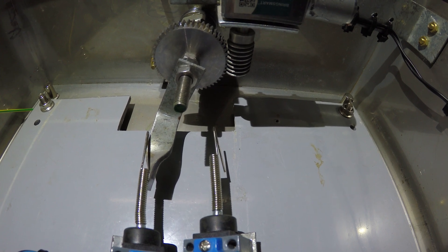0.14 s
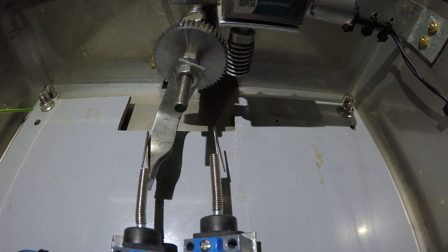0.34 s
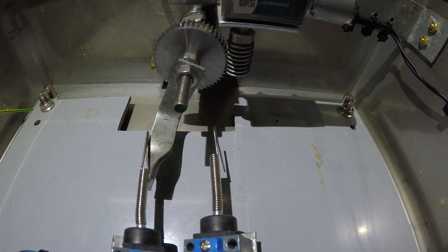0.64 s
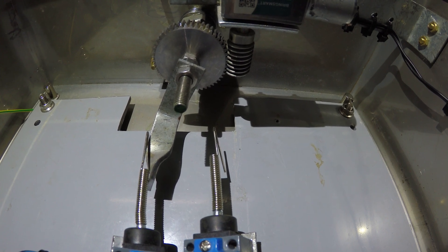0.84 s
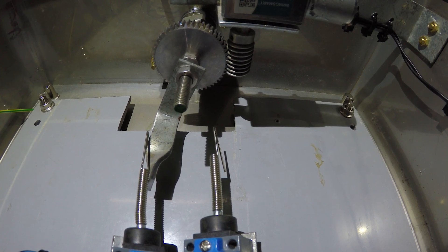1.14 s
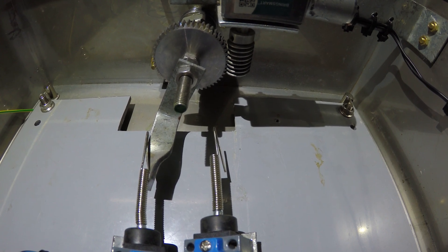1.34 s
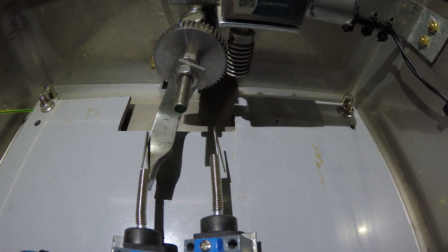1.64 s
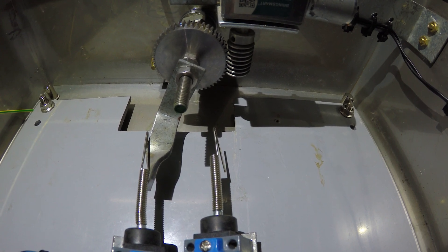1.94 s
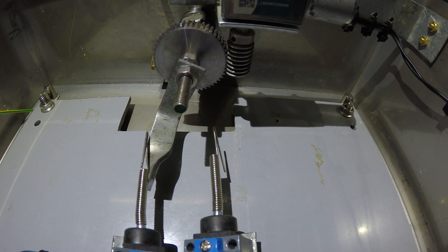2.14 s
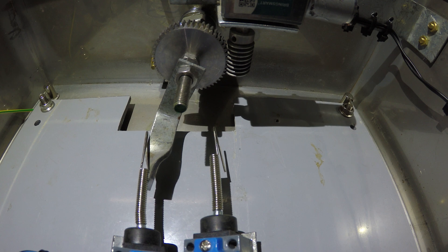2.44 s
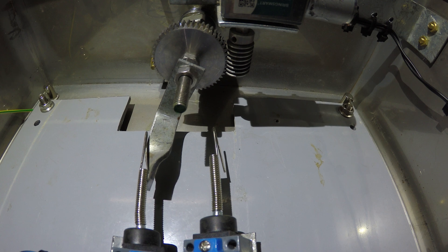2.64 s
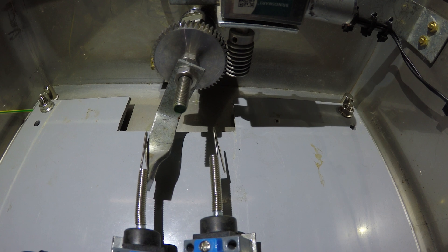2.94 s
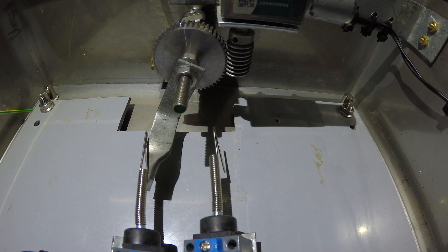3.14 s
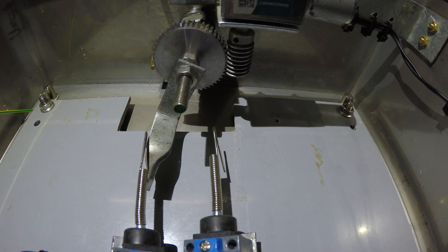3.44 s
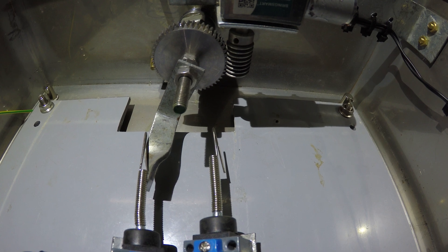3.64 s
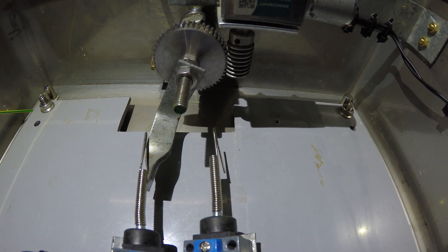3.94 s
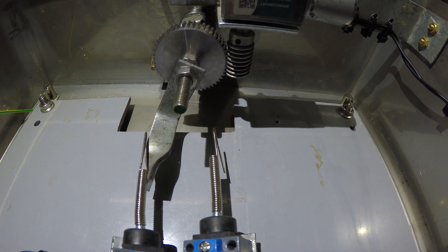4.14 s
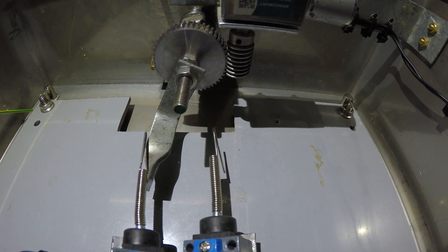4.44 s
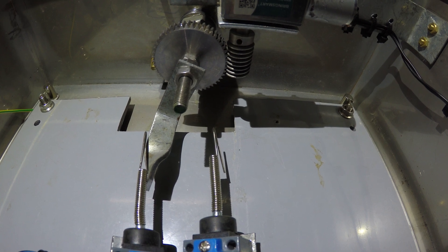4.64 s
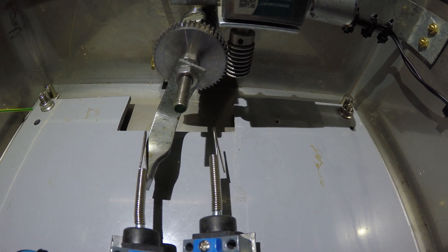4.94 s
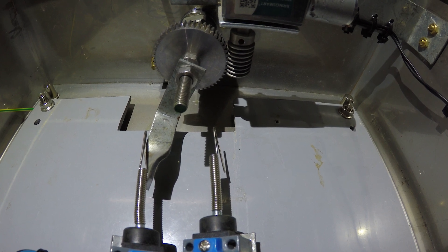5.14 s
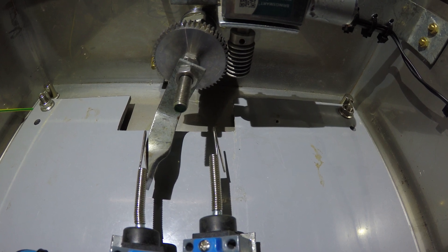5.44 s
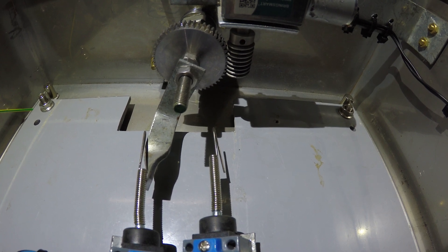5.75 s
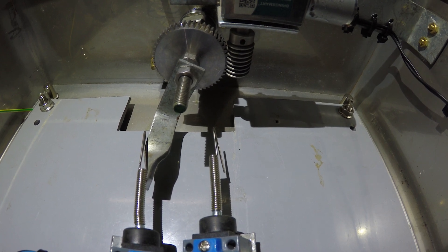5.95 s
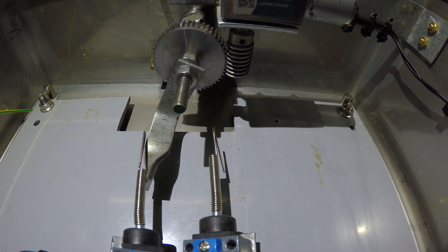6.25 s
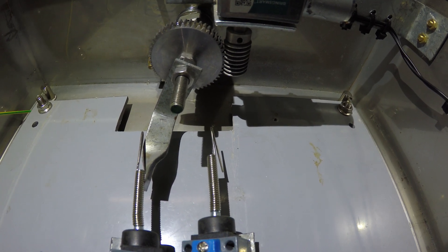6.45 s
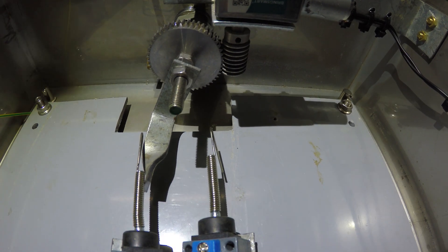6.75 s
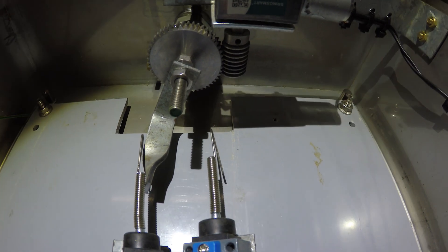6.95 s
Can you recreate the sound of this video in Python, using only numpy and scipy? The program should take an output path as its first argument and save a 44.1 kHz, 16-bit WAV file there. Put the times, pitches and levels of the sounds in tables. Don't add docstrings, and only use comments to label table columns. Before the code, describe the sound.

A small geared motor whirrs and grinds steadily in a metal box, a switch snaps loudly, gears coast ticking to rest, then a lid scrapes.

```python
import sys
import numpy as np
from scipy import signal
from scipy.fft import rfft, irfft, next_fast_len
from scipy.io import wavfile
from scipy.ndimage import uniform_filter1d, map_coordinates

SR = 44100
rng = np.random.default_rng(int(sys.argv[2]) if len(sys.argv) > 2 else 0)


def to_wav(s):
    ch = np.atleast_2d(s).T
    pcm = np.round(np.clip(ch, -1, 1) * 32767)
    wavfile.write(sys.argv[1], SR, pcm.astype(np.int16))


def decibels_to_gain(level_db):
    exponent = np.asarray(level_db, float) / 20
    return 10 ** exponent


N = 313551
T = np.arange(N) / SR
CUT_S = 5.633


def level(x, db):
    return x * decibels_to_gain(db) / np.sqrt(np.mean(x ** 2))


def ring(x, modes):
    size = next_fast_len(N + SR // 2)
    f = np.arange(size // 2 + 1) * SR / size + 1e-3
    body = 0
    for k, (hz, width, db) in enumerate(modes):
        body = body + (-1) ** k * decibels_to_gain(db) / (1 + 1j * (f / hz - hz / f) * hz / width)
    return irfft(rfft(x, size) * body, size)[:N]


def noise():
    return rng.standard_normal(N)


def grit(rough_db, size):
    return level(rng.standard_normal(size) * decibels_to_gain(rough_db * rng.exponential(size=size)), 0)


def colour(points, x):
    hz, db = np.transpose(points)
    f = np.arange(N // 2 + 1) * SR / N + 1
    return irfft(rfft(x) * decibels_to_gain(np.interp(np.log(f), np.log(hz), db)), N)


def blows(table, modes):
    push = 0
    for start, db, length in table:
        push = push + decibels_to_gain(db) * (T >= start) * np.exp(-np.maximum(T - start, 0) / max(length, 1e-4))
    return 10 * ring(push * noise(), modes)


# [f/Hz, level/dB per Hz]
ROOM_COLOUR = [(12, -0.5), (25, 3.5), (45, -0.5), (82, -8), (180, -11.5), (280, -20.5), (720, -31.5),
               (1030, -25), (1190, -32.5), (2400, -32.5), (2730, -33), (13000, -44), (15300, -45)]
# [f/Hz, level/dB]
CIRCUIT_TONES = [(2498, -70), (12484, -81), (899, -78)]


def room():
    tones = sum(np.sqrt(2) * decibels_to_gain(db) * np.sin(2 * np.pi * hz * T) for hz, db in CIRCUIT_TONES)
    return level(colour(ROOM_COLOUR, noise()), -51.5) + tones


# [f/Hz, level/dB per Hz]
WALL_COLOUR = [(300, -23.5), (1500, -10), (2500, -18.5), (3500, 1), (4100, -1.5), (4800, 4.5), (5300, -6.5),
               (6000, -16), (7250, -19), (9000, -12), (11500, -42.5), (15000, -34)]


def walls(x):
    return colour(WALL_COLOUR, x)


# [f/Hz, width/Hz, level/dB]
FRAME_MODES = [(390.4, 27, -3.5), (502, 29, 3), (690, 28, -1)]


def frame(x):
    return ring(x, FRAME_MODES)


def stroke(start, attack, hold, release, db):
    up = np.minimum((T - start) / attack, 1 - (T - start - attack - hold) / release)
    fade_db = 30
    return decibels_to_gain(db - fade_db * (1 - np.minimum(up, 1))) * (T > start)


def sag(x):
    sag_per_s, middle_s = .14, 6.66
    delay = sag_per_s / 2 * np.maximum(T - CUT_S, 0) * (T + CUT_S - 2 * middle_s)
    return map_coordinates(x, [(T - delay) * SR], mode="mirror")


# [f/Hz, width/Hz, level/dB]
LATCH_MODES = [(3140, 120, -6), (4470, 200, -5), (5500, 200, -5), (6400, 160, -8), (7860, 640, -8),
               (8700, 660, -6.5), (11370, 900, -8.5), (14000, 2000, -18.5), (350, 51, -6), (180, 50, -20)]
# [t/s, level/dB, length/s]
LATCH_BLOWS = [
    (6.5735, -32.5, 0.0017),
    (6.595, -52, 0.0028),
    (6.612, -54, .004),
    (6.623, -56, 0.0078),
]
# [f/Hz, width/Hz, level/dB]
FIRST_EDGE_MODES = [(880, 30, -6), (1310, 170, -13), (2100, 350, -12), (2560, 80, -10), (3530, 160, -3.5),
                    (3900, 80, -13), (4330, 90, 2), (6000, 170, -5.5), (7100, 240, -13), (9000, 360, -14),
                    (10500, 450, -17)]
SECOND_EDGE_MODES = [(870, 31, -4), (1357, 40, 4), (1600, 59, -2.5), (2420, 94, -6.5), (3140, 35, -1),
                     (3400, 65, -6), (3760, 42, -13), (5100, 97, -25), (5600, 210, -14.5), (6540, 45, -14),
                     (7250, 100, -18), (8200, 49, -21), (8950, 270, -27), (10040, 110, -23)]
CREEP_STROKE = (6.22, .33, .03, .05, -65)
JOLT_STROKE = (6.595, .027, .003, .06, -52)
FIRST_EDGE_STROKE = (6.56, .045, .17, .25, -54)
SECOND_EDGE_STROKE = (6.5, .3, .6, .1, -54.5)
SHAKE_STROKE = (6.55, .11, .6, .1, -54)
GRIP_STROKE = (6.28, .16, .9, .1, -55)
BUMP_STROKES = [
    (6.76, .09, .01, .1, -51),
    (6.98, .085, .01, .1, -47),
]


def lid():
    jolt = stroke(*JOLT_STROKE)
    first = stroke(*CREEP_STROKE) + stroke(*FIRST_EDGE_STROKE) + jolt
    second = stroke(*SECOND_EDGE_STROKE)
    shake = stroke(*SHAKE_STROKE) + decibels_to_gain(1.5) * jolt
    press = stroke(*GRIP_STROKE) + sum(stroke(*bump) for bump in BUMP_STROKES)
    scrape = first * sag(level(ring(grit(1.8, size=N), FIRST_EDGE_MODES), 5.8))
    scrape = scrape + second * level(ring(grit(3.5, size=N), SECOND_EDGE_MODES), 8.3)
    rub = (first + second) * level(walls(grit(1., size=N)), -3.1)
    sheet_modes = [(107, 43, -6.5), (190, 58, -2.5), (363, 38, -3), (692, 30, -11.0)]
    rumble = shake * level(ring(grit(3.2, size=N), sheet_modes), 2.9)
    grip = press * level(ring(noise(), [(35, 35, 0)]), 1.5)
    return scrape + rub + rumble + grip + blows(LATCH_BLOWS, LATCH_MODES)


# [f/Hz, width/Hz, level/dB]
SWITCH_MODES = [(2270, 130, -2), (2790, 120, 1), (3660, 1100, -12.5), (5230, 200, -0.5), (5600, 190, -2),
                (6750, 200, -0.5), (9600, 3300, -19), (13000, 4900, -20.5)]
# [t/s, level/dB, length/s]
SWITCH_BLOWS = [
    (5.6328, -12, 0.0025),
    (5.6350, -25, 0.0016),
    (5.6385, -23, .002),
    (5.644, -31.5, 0.0071),
]
# [t/s, f/Hz, peak level/dB, t60/s]
SHEET_TONES = [(5.640, 157, -25.5, 0.22), (5.640, 205, -28, 0.25), (5.640, 320, -40, 0.19),
               (5.634, 671, -17.5, 0.087), (5.636, 920, -30.5, .07), (5.637, 1600, -15, 0.12),
               (5.64, 410, -45.5, 0.32), (5.637, 1590, -24.5, 0.3), (5.701, 140, -37, 0.64),
               (6.205, 1040, -54, 0.39)]


def switch():
    rings = 0
    for start, hz, db, t60 in SHEET_TONES:
        decay = decibels_to_gain(db - 60 * np.maximum(T - start, 0) / t60)
        onset = np.clip((T - start) * hz / 2, 0, 1)
        rings = rings + decay * np.sin(2 * np.pi * hz * (T - start)) * onset
    return blows(SWITCH_BLOWS, SWITCH_MODES) + rings


# [t/s, turns per s]
SHAFT_SPEED = [(0.39, 101.833), (1.07, 101.86), (1.75, 101.888), (2.43, 101.891), (3.11, 101.874),
               (3.79, 101.827), (4.47, 101.848), (5.15, 101.809)]
FULL_SPEED = SHAFT_SPEED[-1][1]


def shaft_speed():
    friction, drag = 102.27, 1.0388
    off = np.maximum(T - CUT_S, 0)
    free = (FULL_SPEED + friction / drag) * np.exp(-drag * off) - friction / drag
    return np.where(T < CUT_S, np.interp(T, *np.transpose(SHAFT_SPEED)), np.maximum(free, 1e-3))


def passes(angle, count, phase):
    turns = angle - angle[int(CUT_S * SR)]
    crossed = np.diff(np.floor(count * (turns - phase)), prepend=0) > 0
    return np.flatnonzero(crossed & (turns > 0))


# [f/Hz, width/Hz, level/dB]
BRUSH_MODES = [(11300, 800, -0.5), (13200, 900, -15)]


def brushes(angle):
    clicks = np.zeros(N)
    clicks[passes(angle, count=3, phase=.069)] = 1
    tick_db = -24.5
    size = decibels_to_gain(tick_db - 2 - 7.3 * np.maximum(T - CUT_S, 0) + 1.5 * rng.standard_normal(N))
    return ring(clicks * size, BRUSH_MODES)


def cogging(angle):
    off = np.maximum(T - CUT_S, 0)
    tugs = 9
    pull = sum(np.sin(2 * np.pi * m * tugs * angle) / m for m in (1, 2, 3))
    return decibels_to_gain(-47) * frame(pull * (off > 0) * np.exp(-off / .8))


STRONG_ORDERS = [1, 3, 4, 5, 6, 7, 8, 9, 11, 12, 13, 14, 17, 30, 31, 36, 40, 54, 57, 63, 87, 95, 102, 111,
                 119, 120]
STRONG_ORDERS_DB = [-62, -59, -61, -59, -58, -61, -51, -46, -55, -49, -52, -49, -55, -56, -61, -48, -58,
                    -56, -61, -54, -66, -59, -64, -64, -64, -66]
# [f/Hz, level/dB]
LESSER_LINES = [(1500, -72), (7000, -72), (10000, -72), (10600, -65), (12300, -68), (13500, -73),
                (15200, -76)]


def whine(angle):
    order = np.arange(1, 150)
    hz, ceiling_db = np.transpose(LESSER_LINES)
    weakness, phase = rng.random((2, len(order)))
    db = np.interp(np.log(order * SHAFT_SPEED[0][1]), np.log(hz), ceiling_db) - 10. * weakness
    db[np.array(STRONG_ORDERS) - 1] = STRONG_ORDERS_DB
    turn = np.arange(8193) / 8192
    waves = np.sin(2 * np.pi * (order[:, None] * turn + phase[:, None]))
    lines = np.sqrt(2) * decibels_to_gain(db)[:, None] * waves
    shaft = np.interp(angle % 1, turn, lines[:7].sum(axis=0))
    windings = np.interp(angle % 1, turn, lines[7:].sum(axis=0))
    off = np.maximum(T - CUT_S, 0)
    return cogging(angle) + shaft * np.exp(-off / 0.24) + windings * np.exp(-off / .01)


def wear(tooth, ripples):
    return sum(depth * np.cos(2 * np.pi * times * (tooth - crest) / 24) for times, depth, crest in ripples)


def surface(angle, worn, rough_db):
    grains = 433
    step = (angle * grains).astype(int)
    long, short = grit(rough_db, size=72 * grains), grit(rough_db, size=24 * grains)
    worn = np.clip(worn, 0, 1) * (T < CUT_S)
    marks = (long[step % len(long)] + 1.26 * short[step % len(short)]) / 2.07
    return np.sqrt(worn) * marks + np.sqrt(1 - worn) * grit(rough_db, size=N)


def contact(since, rise, decay):
    since = np.maximum(since, 0)
    return (1 - np.exp(-since / rise)) * np.exp(-since / decay)


PROUD_TURNS = [2, 3, 7, 12, 14, 16, 20, 23, 25, 26, 29]
PROUD_TURNS_DB = [6.2, 5.1, 3, 3, 4, 8.6, 6.6, 4, 6.6, 5.7, 6.2]


def coasting(touch, share):
    t = T[T >= CUT_S]
    extra = dict(zip(PROUD_TURNS, PROUD_TURNS_DB))
    hits = []
    for k, i in enumerate(touch):
        size = decibels_to_gain(-24.5 + extra.get(k, 0)) * share[i] ** 1.13
        hits.append((T[i] - .002, size))
    last_s, last_size = hits[-1]
    hits.append((last_s + .019, last_size * decibels_to_gain(-5)))
    force = 0
    for start, size in hits:
        slow = 1 + 2.3 * (start - CUT_S)
        knock = contact(t - start, rise=0.0012, decay=0.0014 * slow)
        drag = 0.041 * contact(t - start, rise=0.0037, decay=0.043)
        force = force + size * decibels_to_gain(27.5) * (knock + drag)
    return np.pad(force, (N - len(t), 0))


def slackening(touch, share):
    starts = np.append(CUT_S, T[touch])
    since = T - starts[np.searchsorted(touch, np.arange(N))]
    relax_db_per_s = 260
    return uniform_filter1d(decibels_to_gain(1 - relax_db_per_s * np.maximum(since, 0)), size=300) * share ** 0.89


# [f/Hz, width/Hz, level/dB]
PANEL_MODES = [(805, 15, -12), (850, 14, -6), (875, 12, -9), (945, 40, -10), (987, 18, -4), (1030, 22, -4),
               (1065, 28, -3), (1100, 22, -6), (1175, 50, -9), (1225, 25, -4), (1283, 22, 0),
               (1327, 18, -4), (1420, 18, -4), (1440, 16, -3), (1590, 25, -9), (1650, 30, -13),
               (1740, 40, -11), (1790, 25, -11), (1900, 50, -16), (2050, 35, -12), (2140, 50, -16),
               (2230, 40, -17), (2340, 30, -12), (2440, 60, -19)]
GEARBOX_MODES = [(2560, 60, -14), (2770, 40, -8), (2890, 30, -9), (3050, 40, -12), (3300, 50, -10),
                 (3420, 45, -1), (3497, 50, -1), (3610, 40, -4), (3667, 30, -2), (3830, 50, -6),
                 (4075, 40, -7), (4140, 50, -7), (4358, 40, -3), (4410, 40, -6), (4670, 40, -5),
                 (4740, 60, 0), (4880, 70, -4), (5050, 80, -6), (5267, 60, -5), (5450, 60, -14),
                 (6420, 40, -16), (6850, 60, -18)]
BRACKET_MODES = [(6908, 100, 10.5), (7430, 28, -1), (9140, 50, -0.5), (9160, 250, -2), (9670, 110, 2),
                 (9700, 11, -6), (11080, 99, -4)]
# [f/Hz, level/dB per Hz]
HISS_COLOUR = [(60, -26), (160, 4), (260, -10), (500, -14), (2000, -11), (6300, 0), (7250, -4),
               (9000, -3.5), (11500, -8.5), (15300, -24.5)]
KNOCK_RIPPLES = [(1, 1.1, 23.8), (2, .7, 5.2), (6, .7, 2.15), (9, .85, 1.65), (10, .6, .4)]
GRIND_RIPPLES = [(1, .55, 1.4), (2, .8, 7.5), (5, .5, 4.35), (8, .6, .45), (10, .45, 1.7)]
PLACE_RIPPLES = [(1, .03, 20.3), (3, .02, 4.2), (7, .02, 3.4), (12, .015, 0)]


def gears(angle, speed):
    part, tooth = (angle - .2) % 1 + .2, np.floor(angle - .2)
    place = .59 + wear(tooth, PLACE_RIPPLES)
    bump = np.exp(-((part - place + .1) / .155) ** 2)
    driven = .08 + decibels_to_gain(wear(tooth, KNOCK_RIPPLES)) * bump
    touch, share = passes(angle, count=1, phase=.82), speed / FULL_SPEED
    force = driven * (T < CUT_S) + coasting(touch, share)
    hits = force * surface(angle, worn=.85, rough_db=1.)
    throb = 1 + 0.44 * (driven - .35)
    powered = decibels_to_gain(0.98 * wear(tooth, GRIND_RIPPLES)) * throb
    load = np.where(T < CUT_S, powered, slackening(touch, share))
    grind = ring(load * surface(angle, worn=.85, rough_db=1.5), PANEL_MODES)
    blur = walls(force * surface(angle, worn=.6, rough_db=1.5))
    hiss = colour(HISS_COLOUR, uniform_filter1d(load, size=2000) * noise())
    groan = frame(np.sqrt(np.abs(load)) * noise())
    greased = [(hz, 1.3 * width, db) for hz, width, db in GEARBOX_MODES]
    layers = [(ring(hits, greased), -33), (grind, -34.5), (ring(hits, BRACKET_MODES), -51),
              (blur, -36), (hiss, -46), (groan, -57)]
    return sum(x * decibels_to_gain(db) / np.std(x[:5 * SR]) for x, db in layers)


def scene():
    speed = shaft_speed()
    angle = np.cumsum(speed) / SR
    motor = gears(angle, speed) + whine(angle) + brushes(angle)
    return (room() + lid() + switch() + motor)[None, :]


def roll_off(x):
    return signal.sosfilt(signal.butter(12, 16630, fs=SR, output="sos"), x)


def record(dry):
    overload, top_hz = .7, 15350
    rounded = overload * np.tanh(dry / overload)
    steep = signal.ellip(14, .3, 70, top_hz, fs=SR, output="sos")
    return roll_off(signal.sosfilt(steep, rounded))


dry = scene()
out = record(dry)
to_wav(out)
```